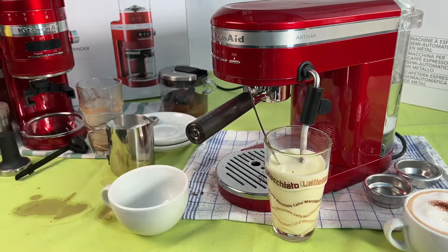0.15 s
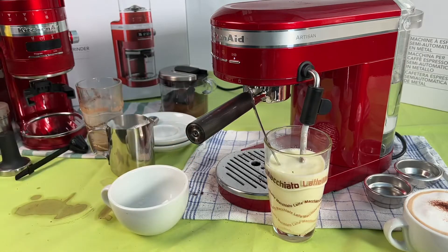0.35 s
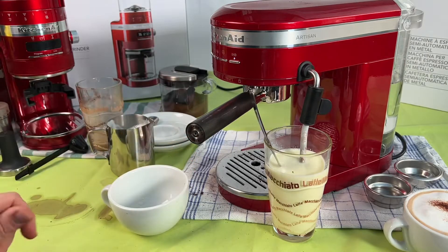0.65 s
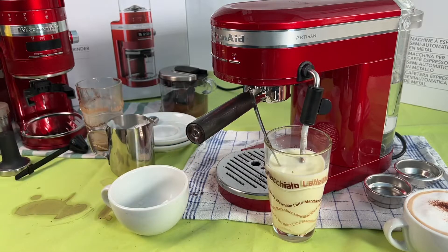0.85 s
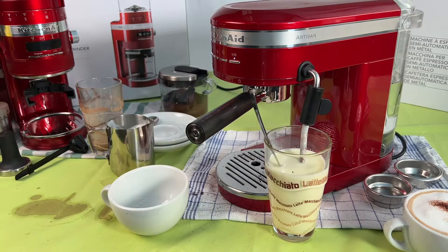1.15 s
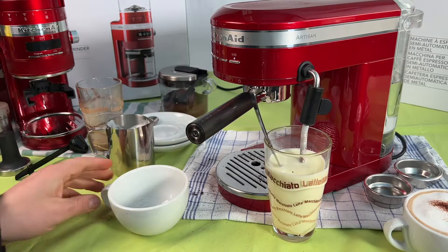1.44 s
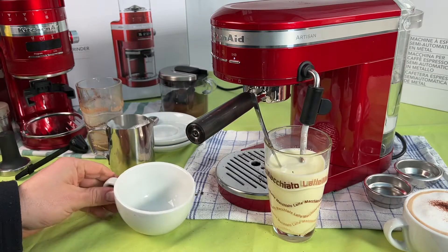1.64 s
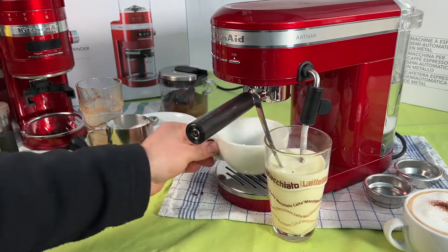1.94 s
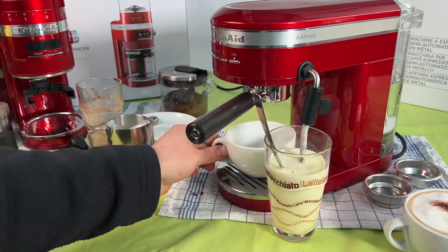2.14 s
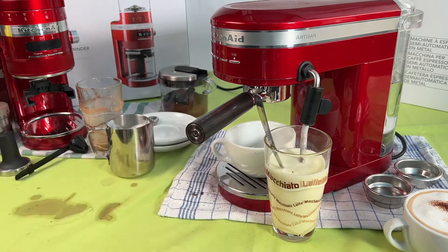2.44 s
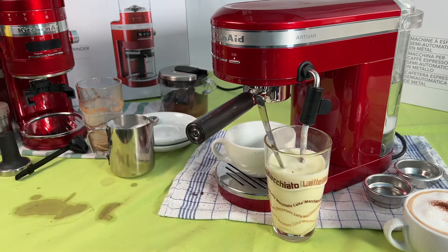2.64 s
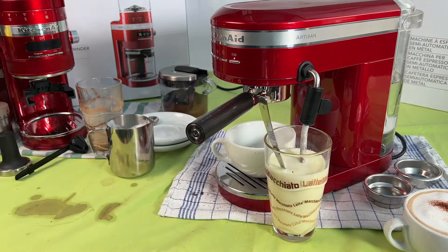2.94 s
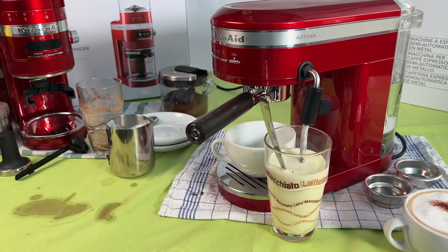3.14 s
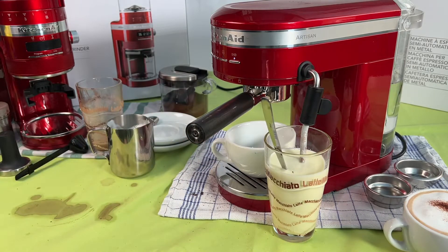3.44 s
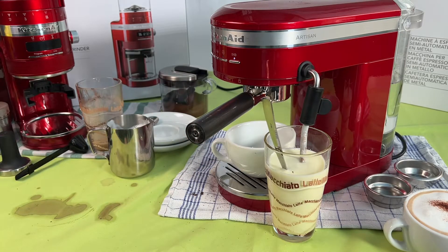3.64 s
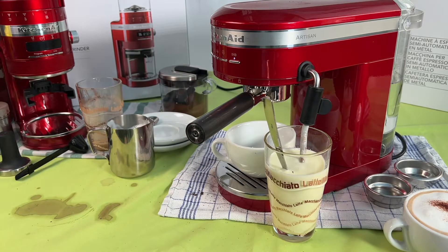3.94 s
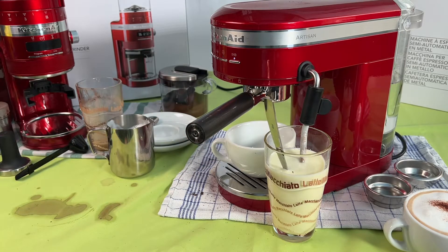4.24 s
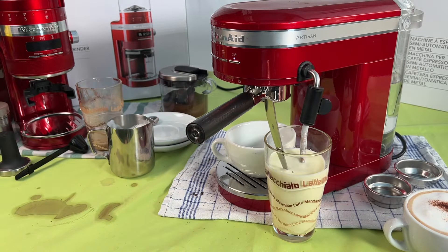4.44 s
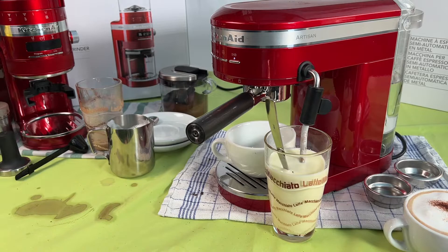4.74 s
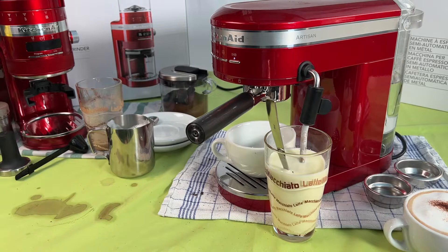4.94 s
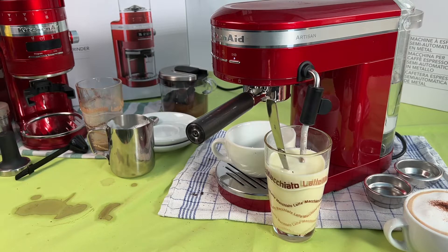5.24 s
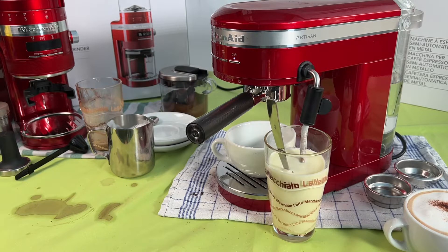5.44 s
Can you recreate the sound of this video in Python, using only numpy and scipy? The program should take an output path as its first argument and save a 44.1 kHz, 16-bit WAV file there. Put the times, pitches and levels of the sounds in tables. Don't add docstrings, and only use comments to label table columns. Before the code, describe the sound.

Constant loud steam hiss from an espresso machine frothing milk, with quick, soft, even pump knocks underneath in a kitchen.

```python
import sys
import numpy as np
from scipy import signal
from scipy.io import wavfile
from scipy.ndimage import uniform_filter1d

SR = 44100
rng = np.random.default_rng(int(sys.argv[2]) if len(sys.argv) > 2 else 0)


def put_to_file(sound):
    columns = np.atleast_2d(sound).T
    safe = np.clip(columns, -1, 1)
    whole_steps = np.round(safe * 32767)
    wavfile.write(sys.argv[1], SR, whole_steps.astype(np.int16))


def elevation(decibels):
    levels = np.asarray(decibels, float)
    return 10 ** (levels / 20)


N = 246078


def evened(x):
    return x / np.sqrt(np.mean(x ** 2) + 1e-20)


def read(points, hz):
    f, value = np.transpose(points)
    return np.interp(np.log(hz + 1), np.log(f + 1), value)


def bell(hz, centre_hz, width_hz, steep):
    return (1 + (2 * (hz - centre_hz) / width_hz) ** 2) ** -steep


def ramp(t, start_s, length_s):
    return np.clip((t - start_s) / length_s, 0, 1)


def kitchen(x):
    t = np.arange(0.004, 0.4, 0.001)
    taps = np.zeros((2, SR // 2))
    at = ((t + rng.random((2, len(t))) * 0.0011) * SR).astype(int)
    t60 = 0.14
    echoes = rng.choice([-1.0, 1.0], at.shape) * elevation(-60 * t / t60)
    np.put_along_axis(taps, at, echoes, 1)
    taps /= np.linalg.norm(taps[0])
    return signal.fftconvolve(x[None], taps, axes=1)[:, :N]


def strokes(count=25):
    first_s, pair_s, short_gap_s = 0.2142, 0.45027, 0.2202
    k = np.arange(count) - 1
    start_s = first_s + k // 2 * pair_s + k % 2 * short_gap_s
    tire_db_per_s = 0.21
    return start_s, -35.5 - tire_db_per_s * start_s - 3 * (start_s < 0)


def pump():
    # frequency [Hz], level [dB], t60 [s], build-up [s].
    housing = [(87, 1, 0.119, 0.019), (136, -19, 0.39, 0.026), (191, 4.5, 0.075, 0.0059),
               (209, -21.5, 0.35, 0.0053), (266.5, -6, 0.24, 0.017), (380, 2, 0.073, 0.0058),
               (428, -14, 0.15, 0.01), (494, -9.5, 0.1, 0.004), (634, -8.5, 0.08, 0.0023),
               (865, -3, 0.047, 0.0017), (1046, 1.5, 0.021, 0.00079), (1500, -8, 0.074, 0.00046),
               (1810, -3.5, .02, .0004)]
    t, lead = np.arange(16000) / SR, 2000
    out = np.zeros(N + lead + len(t))
    for start_s, stroke_db in zip(*strokes()):
        knock = np.zeros(len(t))
        for hz, db, t60, build_up_s in housing:
            decay = elevation(db + 0.6 * rng.standard_normal() - 60 * t / t60)
            build_up = 1 - np.exp(-(t / build_up_s) ** 2)
            knock -= decay * build_up * np.sin(2 * np.pi * hz * t)
        at = round(start_s * SR) + lead
        out[at:at + len(t)] += elevation(stroke_db) * knock
    return out[lead:lead + N]


def cup_shade(t):
    bare, covered, cup_down_s, settle_s = 0.11, 1, 2.5, 0.68
    return np.clip(bare + (covered - bare) / (1 + np.exp((cup_down_s - t) / settle_s)), 0, 1)


def arm_reach(t):
    rest, under = 0.12, 0.83
    return rest + (under - rest) * (ramp(t, 1.42, 0.57) - ramp(t, 2.01, 0.23))


def glass_air(hz, t, note_hz):
    # ratio to the second note, width [Hz], level at first [dB], level at last [dB].
    air_notes = [(0.539, 56.6, -13, -26), (0.512, 221, -29, -26), (0.999, 44.2, 3, -0.5),
                 (1.067, 119, -8, -17.5), (1.463, 110, 4.5, 4.5), (1.522, 59.6, -6.5, 3.5),
                 (4.93, 300, -16, -10)]
    power = 0
    for ratio, width_hz, first_db, last_db in air_notes:
        db = first_db + (last_db - first_db) * t * SR / N
        power = power + elevation(2 * db) * bell(hz, ratio * note_hz, width_hz, 1.294)
    return power


def machine_hollows(hz, cup):
    # frequency [Hz], width [Hz], level [dB].
    bare_hollows = [(3698, 120, 0.5), (4050, 100, -6), (4387, 80, -3), (4890, 22, -2.5), (5380, 59, -8),
                    (6170, 55, -20), (6220, 58, -8.5), (6880, 120, -14.5), (7810, 950, -5),
                    (8700, 47, -20.5), (9500, 27, -6), (8900, 110, -13), (10700, 38, -21), (10800, 62, -23),
                    (11090, 58, -5.5), (11600, 32, -15.5), (12700, 200, -6.5), (13200, 40, -14),
                    (14400, 670, -10.5), (14900, 180, -13)]
    # frequency [Hz], width [Hz], level [dB].
    cup_hollows = [(3532, 31, 2), (3900, 50, -6), (4075, 240, -3), (5253, 83, -4.5), (6160, 110, -13),
                   (6673, 56, -4.5), (7410, 75, -6.5), (9090, 134, -11), (9600, 75, -21), (10080, 190, -8),
                   (10640, 220, -7.5), (12780, 110, -11), (13400, 170, -24), (13810, 90, -8.5),
                   (14230, 280, -12), (14800, 150, -21), (15200, 47, -22), (15600, 150, -20)]
    bare = sum(elevation(2 * db) * bell(hz, f, width, 1.6) for f, width, db in bare_hollows)
    with_cup = sum(elevation(2 * db) * bell(hz, f, width, 1.8) for f, width, db in cup_hollows)
    return (1 - cup) * elevation(-2.5) * bare + cup * elevation(-3.0) * with_cup


def notches_db(hz, note_hz, cup, arm):
    # frequency [Hz], width [Hz], depth bare [dB], depth with cup [dB].
    dips = [(647, 164, 6, 5.5), (2690, 180, 0.5, -1.5), (1612, 100, 12, 8), (3970, 27, 12, 15),
            (5143, 90, 2, 19.5), (5560, 133, -1, 9), (7465, 265, 19.5, 0), (8450, 343, 23, 3),
            (8140, 174, 3.5, 9.5), (9260, 120, -0.5, 13), (12250, 200, 8, 1), (11450, 340, 5.5, 16.5),
            (13570, 200, 8, 5), (14600, 200, 9, 8), (15850, 450, 13, 7)]
    # frequency [Hz], width [Hz], level [dB].
    arm_colour = [(2210, 150, 7), (5600, 250, -0.5), (8430, 235, -8), (10850, 1500, 6), (12560, 400, 1),
                  (14000, 1500, -0.5)]
    db = arm * sum(gain_db * bell(hz, f, width, 0.94) for f, width, gain_db in arm_colour)
    for f, width, bare_db, cup_db in dips:
        db = db - (bare_db + (cup_db - bare_db) * cup) * bell(hz, f, width, 0.67)
    return db - 20.4 * bell(hz, 1.2995 * note_hz, 380, 0.93)


def near_echoes(hz, cup, arm, count=24):
    # frequency [Hz], level [dB].
    side_echo = [(60, -30), (300, -16), (700, -15), (1200, -4.5), (1600, 3), (2500, -17), (3600, -5.5),
                 (5500, -8), (7000, -1.5), (8500, -1.5), (10000, -11.5), (12000, 0), (15000, -7.5)]
    delay_s = rng.random((2, 2, count)) * 0.012 + 0.0002043
    size = rng.standard_normal(delay_s.shape) * elevation(-60 * delay_s / 0.049)
    ripple = (size[:, :, None] * np.exp(-2j * np.pi * hz * delay_s[:, :, None])).sum(-1)
    ripple /= np.linalg.norm(size, axis=-1, keepdims=True)
    bare, with_cup = ripple[..., None]
    shared, sideways = bare * np.sqrt(1 - cup) + with_cup * np.sqrt(cup)
    sideways = sideways * elevation(read(side_echo, hz) - 2.2 * arm)
    return 1 + elevation(-9.5) * shared + np.array([sideways, -sideways])


def steam():
    # frequency [Hz], level [dB].
    jet = [(40, -52), (90, -37), (250, -46.5), (600, -39.5), (950, -27.5), (1400, -34.5), (1900, -31.5),
           (2500, -19.5), (3000, -5), (4500, -13.5), (6000, -19), (9000, -19.5), (13000, -19.5),
           (16000, -32.5)]
    # frequency [Hz], likeness [0-1].
    likeness = [(100, 0.94), (400, 0.95), (800, 0.62), (1300, 0.84), (2000, 0.75), (2600, 1), (3600, 0.93),
                (5000, 0.96), (6000, 0.68), (7000, 0.98), (8500, 0.82), (9800, 0.7), (12000, 0.78),
                (15000, 1)]
    # frequency [Hz], left over right [dB].
    stereo_lean = [(100, 0.5), (400, 3.5), (700, -4), (1200, 0.5), (2400, 1.5), (3200, -3), (4100, 1),
                   (5500, -1), (8500, 4), (10000, 2.5), (12500, 9), (15000, 5)]
    frames, hz = N // 256 + 9, np.fft.rfftfreq(2048, 1 / SR)[:, None]
    t = np.arange(frames) * 256 / SR
    note_hz = 2206 - 27.6 * t
    cup, arm = cup_shade(t), arm_reach(t)
    power = elevation(2 * read(jet, hz)) + glass_air(hz, t, note_hz) + machine_hollows(hz, cup)
    power = power * elevation(2 * notches_db(hz, note_hz, cup, arm))

    a, b, c, d, patches = rng.standard_normal((frames, 1025, 5)).T
    same, left = np.clip(read(likeness, hz), -1, 1), a + 1j * b
    right = same * left + np.sqrt(1 - same ** 2) * (c + 1j * d)
    patches = uniform_filter1d(patches, size=25, axis=0)
    patches = evened(uniform_filter1d(patches, size=14, axis=1))
    lean = read(stereo_lean, hz) / 2
    z = np.array([left, right]) * near_echoes(hz, cup, arm) * np.sqrt(power)
    z *= elevation(0.53 * patches + np.array([lean, -lean]))
    hiss = evened(signal.istft(z, nperseg=2048, noverlap=1792)[1][:, :N])

    sputter = evened(uniform_filter1d(rng.standard_normal(N), size=900))
    swell_db_per_s = 0.2278
    return hiss * elevation(-23.4 + swell_db_per_s * np.arange(N) / SR + 0.35 * sputter)


def scene():
    knocks = pump()
    upper = signal.sosfilt(signal.butter(2, 220, "high", fs=SR, output="sos"), knocks)
    pump_lean = elevation([[0.55], [-0.55]])
    return steam() + knocks * pump_lean + elevation(-9.0) * kitchen(upper)


def roll_off(x):
    return signal.sosfilt(signal.butter(12, 15900, fs=SR, output="sos"), x)


def record(dry):
    cut = signal.sosfilt(signal.butter(3, 75, "high", fs=SR, output="sos"), dry)
    return roll_off(cut)


dry = scene()
out = record(dry)
put_to_file(out)
```